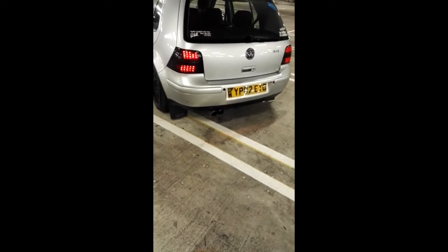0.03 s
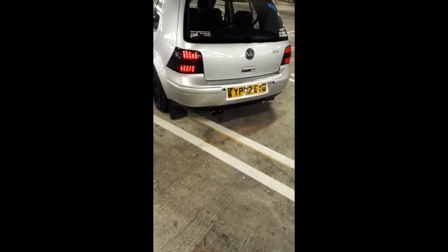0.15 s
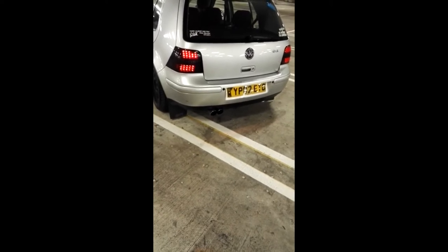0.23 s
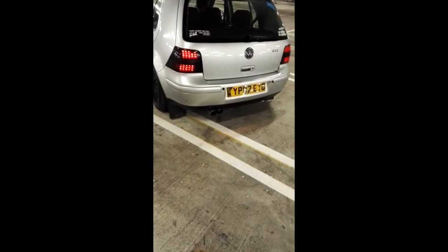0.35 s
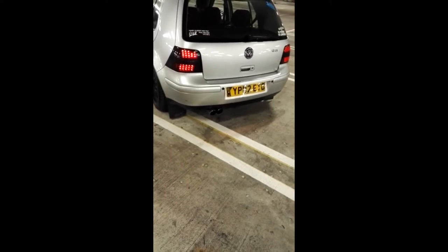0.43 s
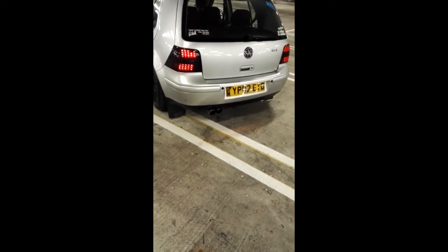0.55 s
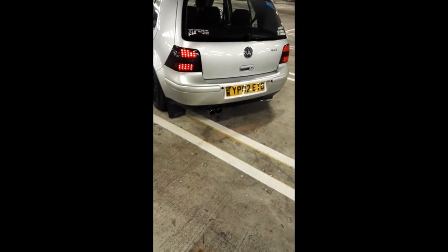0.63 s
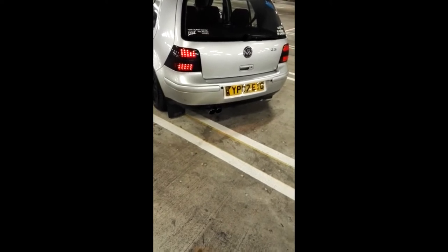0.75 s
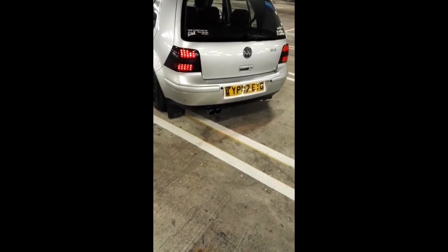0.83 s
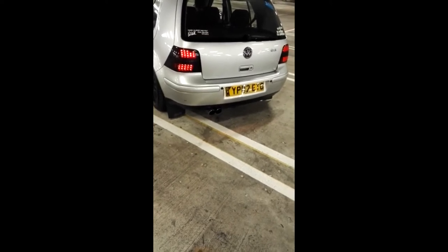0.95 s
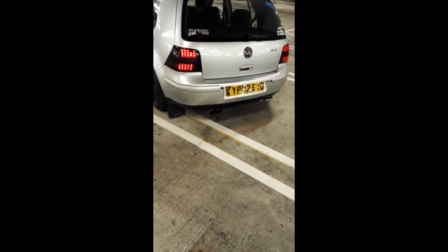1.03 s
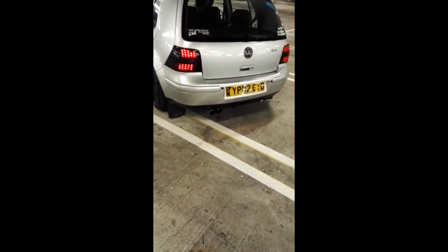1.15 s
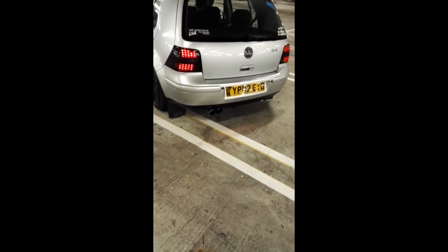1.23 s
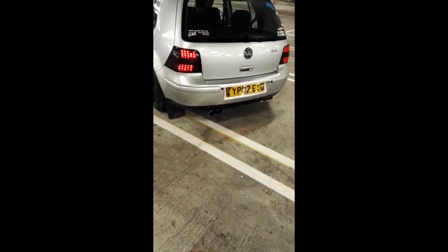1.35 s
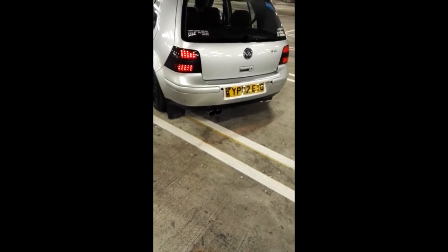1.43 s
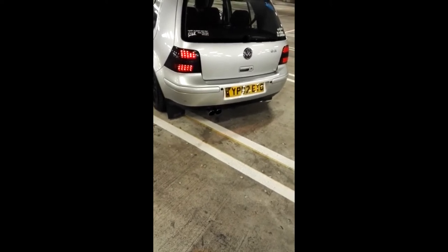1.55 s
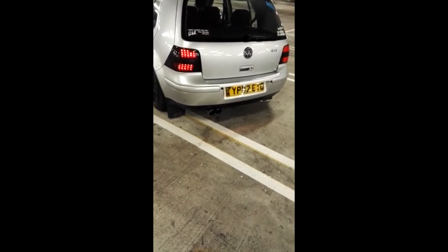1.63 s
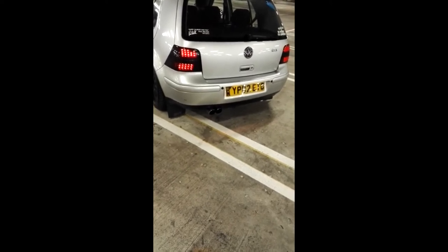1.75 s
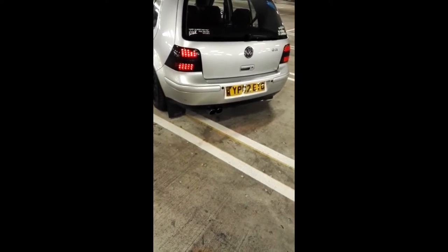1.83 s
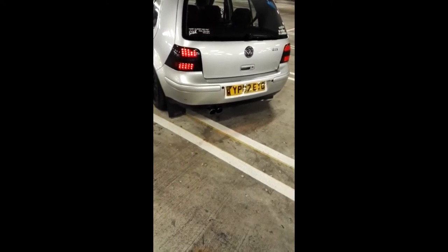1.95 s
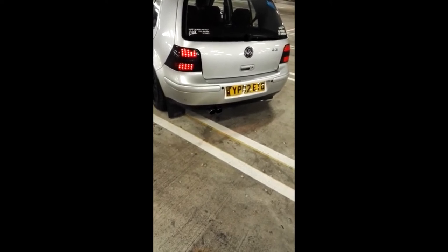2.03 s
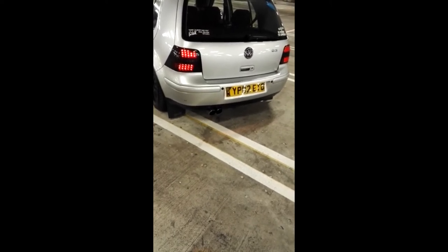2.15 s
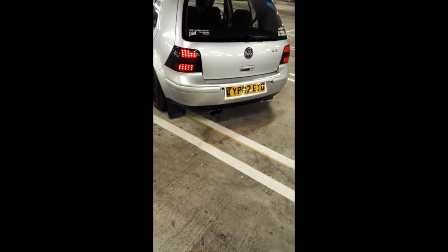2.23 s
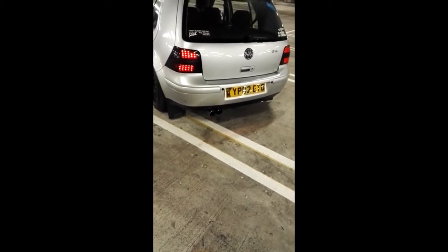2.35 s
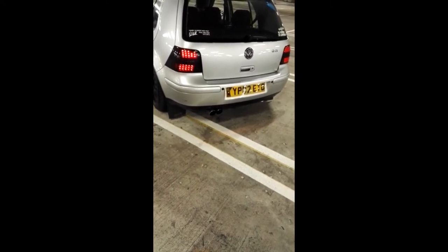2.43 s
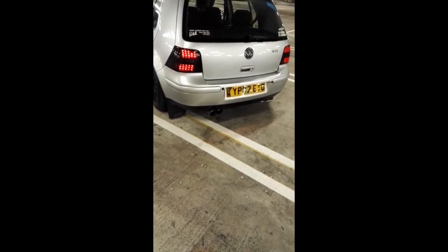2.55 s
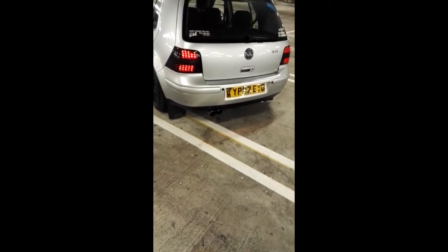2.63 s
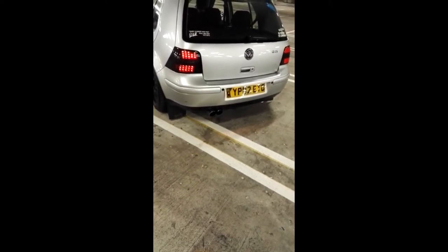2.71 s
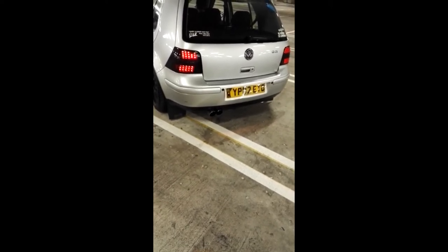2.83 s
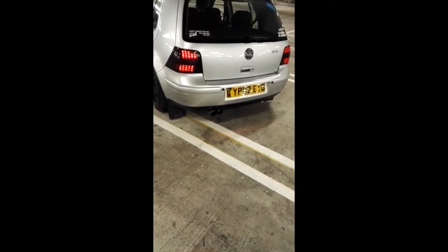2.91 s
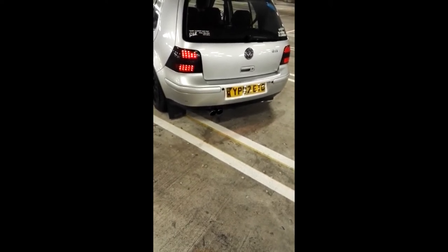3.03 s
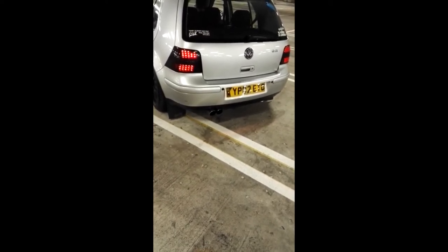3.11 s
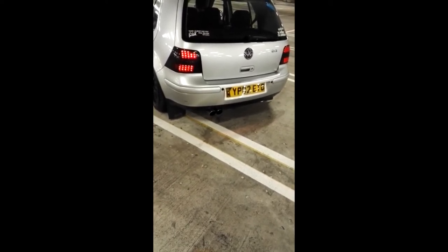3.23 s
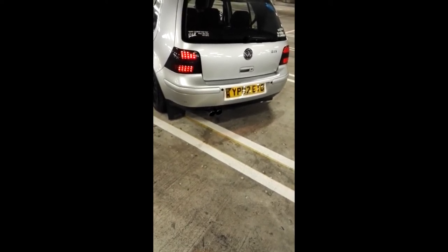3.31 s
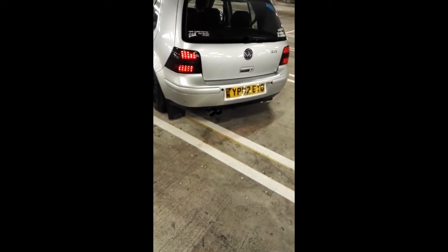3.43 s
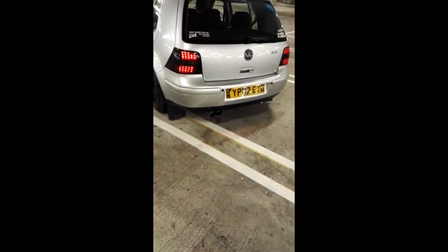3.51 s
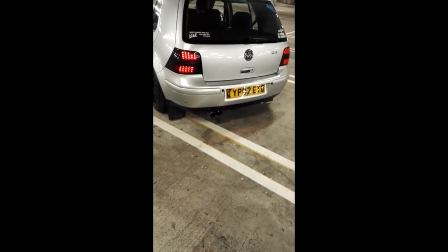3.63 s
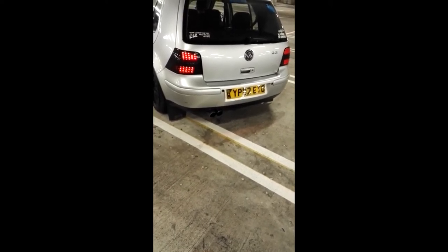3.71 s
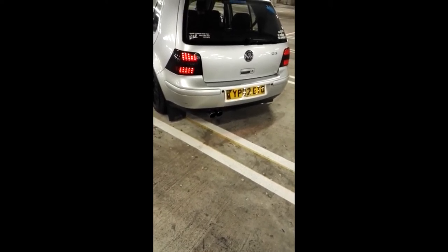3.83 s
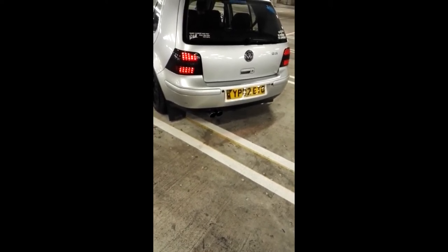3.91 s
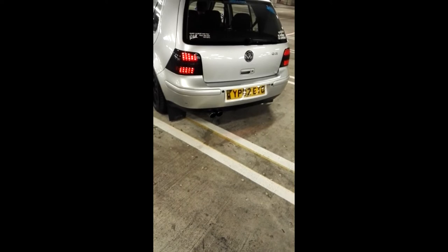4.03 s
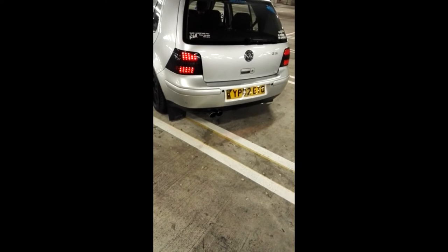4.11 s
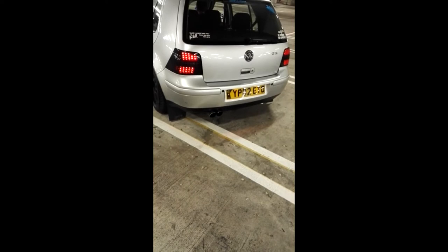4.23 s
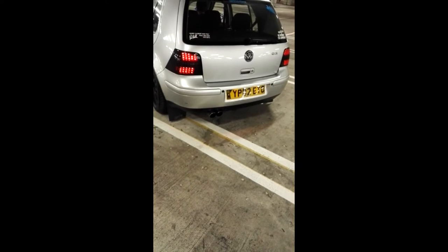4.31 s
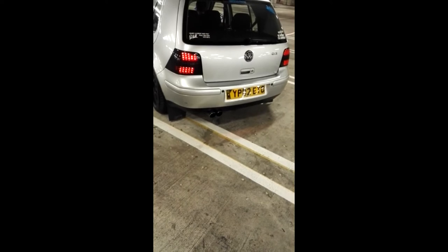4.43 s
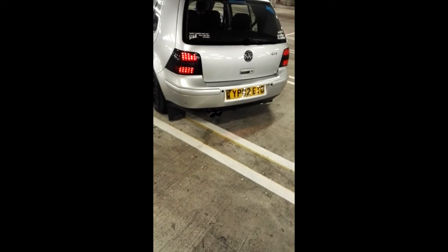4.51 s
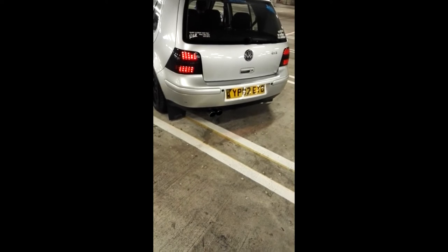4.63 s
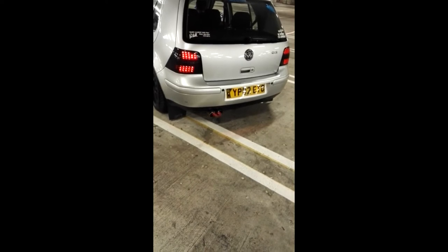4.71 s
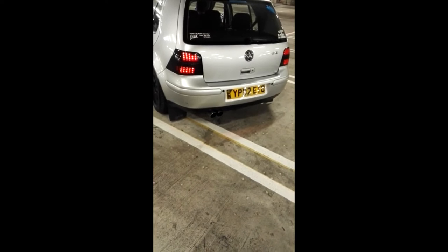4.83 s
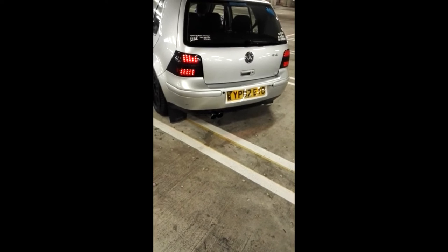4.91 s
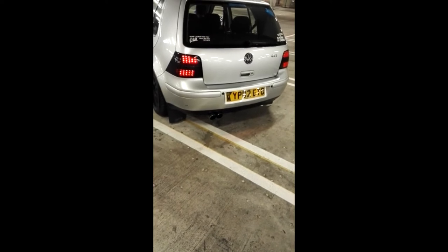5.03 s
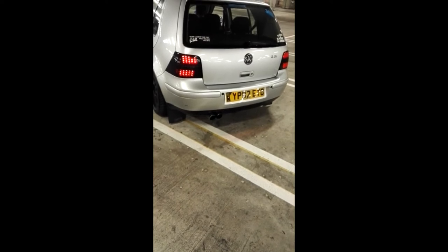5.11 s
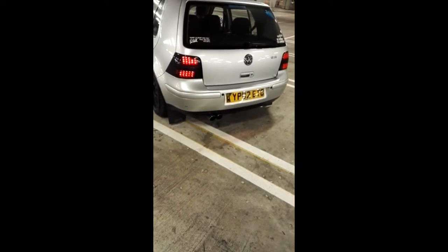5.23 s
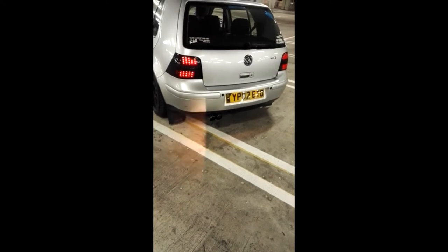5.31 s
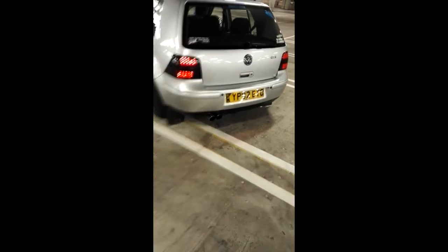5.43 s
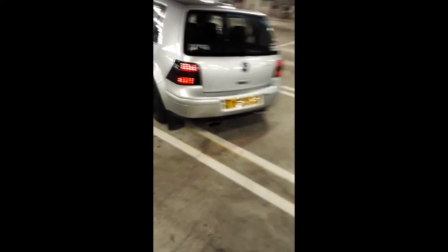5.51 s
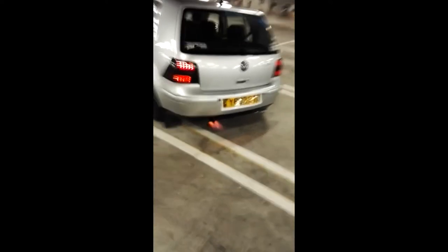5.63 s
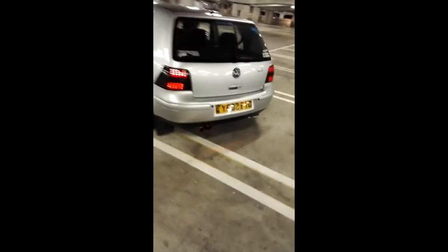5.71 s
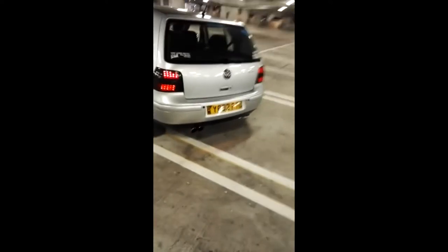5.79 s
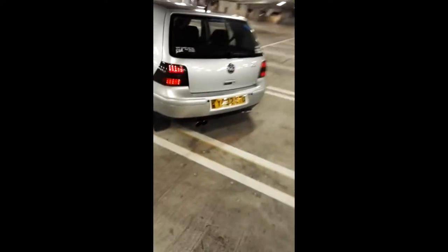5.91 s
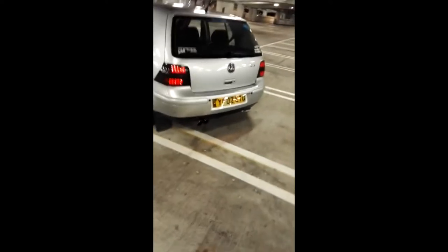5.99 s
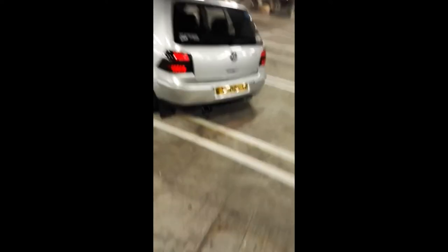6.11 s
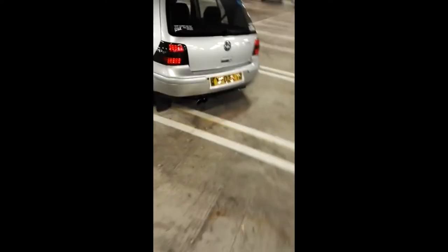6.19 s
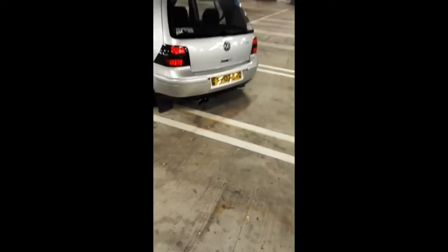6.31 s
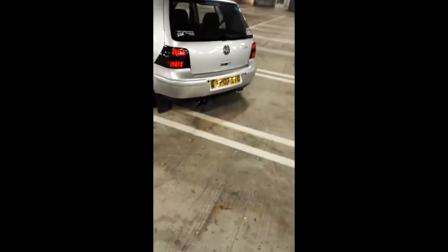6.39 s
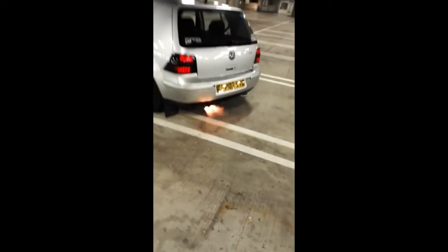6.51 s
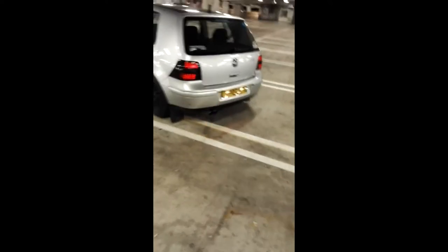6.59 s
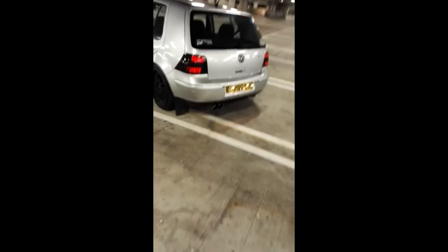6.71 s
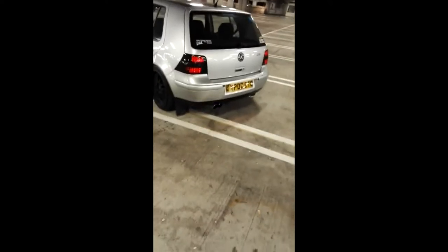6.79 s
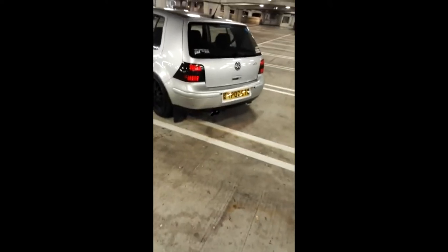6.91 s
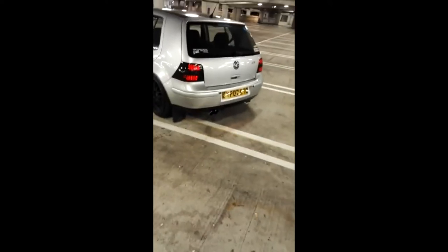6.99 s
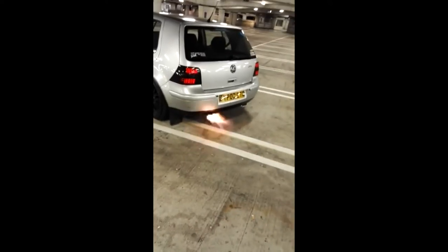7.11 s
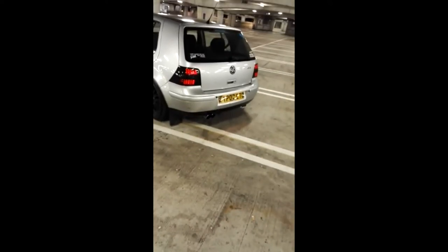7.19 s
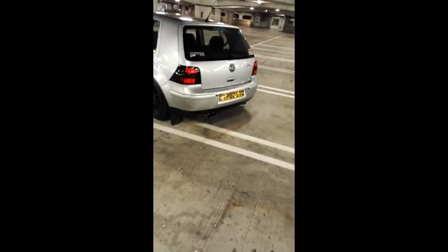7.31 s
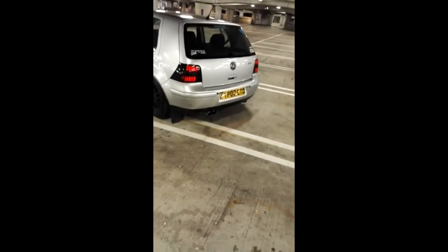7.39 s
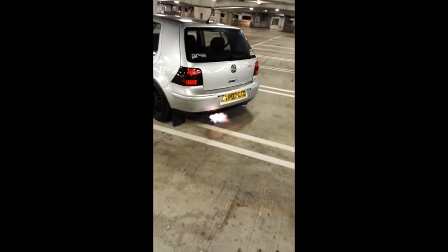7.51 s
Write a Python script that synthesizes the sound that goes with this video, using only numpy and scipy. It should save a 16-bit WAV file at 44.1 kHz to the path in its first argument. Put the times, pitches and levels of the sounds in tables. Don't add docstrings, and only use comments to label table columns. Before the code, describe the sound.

A car held on its rev limiter stutters and buzzes, then lifts off with violent exhaust bangs ringing through a concrete car park.

```python
import sys
import numpy as np
from scipy import signal
from scipy.fft import rfft, irfft, next_fast_len
from scipy.io import wavfile
from scipy.ndimage import uniform_filter1d

SR = 44100
rng = np.random.default_rng(int(sys.argv[2]) if len(sys.argv) > 2 else 0)


def voltage_ratio(decibels):
    exponent = np.asarray(decibels, float) / 20
    return 10 ** exponent


def transcribe(signal):
    frames = np.atleast_2d(signal).T
    limited = np.clip(frames, -1, 1)
    pcm = np.round(limited * 32767).astype(np.int16)
    wavfile.write(sys.argv[1], SR, pcm)


N = 332980
HOP = 64
TIME = np.arange(N) / SR

# time in s, firing rate in Hz.
REVS = [(0, 113.9), (.2, 118.3), (.4, 124.2), (.6, 128.7), (.8, 131.7), (1, 133.3), (2.2, 131.4),
        (2.5, 132.3), (4.7, 132.6), (7.6, 129.5)]
# time in s, firing tone between surges in dB, gas flow in dB.
THROTTLE = [(0, -15.5, -1.5), (.1, -15, -3.5), (.5, -15, -3), (.75, -12, -4.5), (1.0, -16.5, -2.5),
            (1.35, -14, -5), (2.0, -15, -7.5), (2.22, -20, -1), (2.35, -14, -2.5), (2.92, -14, -2),
            (3.1, -18, -5), (3.5, -20.5, -3), (4.28, -17.5, -3.5), (4.42, -16.5, -9), (4.62, -22, -3),
            (4.76, -21, 3)]
# start in s, length in s, level in dB.
SURGES = [(0.812, 0.042, -7.3), (0.903, 0.034, -8.3), (0.994, 0.037, -6.9), (1.1, 0.046, -7.3),
          (1.256, 0.029, -7.5), (1.337, 0.047, -7.2), (1.523, 0.039, -8.4), (1.697, 0.048, -8.9),
          (1.898, 0.047, -9.3), (2.081, 0.064, -9.7), (2.19, 0.041, -10.5)]
# start in s, length in s, level in dB.
HAMMER = [(2.275, 0.046, -6.9), (2.373, 0.049, -6.2), (2.488, 0.064, -8.9), (2.611, 0.037, -8.2),
          (2.694, 0.058, -7.0), (2.815, 0.06, -8.4), (2.935, 0.064, -8.1), (3.05, 0.048, -10.4),
          (3.133, 0.061, -9.4), (3.256, 0.059, -10.9), (3.352, 0.044, -10.1), (3.458, 0.063, -10.9),
          (3.576, 0.063, -11.3), (3.67, 0.047, -10.1), (3.781, 0.067, -11.5), (3.898, 0.069, -11.1),
          (3.995, 0.029, -10.9), (4.054, 0.046, -10.1), (4.136, 0.043, -9.0), (4.218, 0.044, -10.9),
          (4.293, 0.042, -10.7), (4.414, 0.051, -11.5), (4.509, 0.051, -12.7), (4.619, 0.06, -12.1)]
# frequency in Hz, left-right likeness (-1 to 1).
SAME_NEAR = [(60, 0.8), (130, 1), (290, 0.62), (640, 0.37), (1400, 0.28), (3080, 0.036), (6760, 0.23),
             (14900, 0.31)]
# start in s, blast in dB, late ring in dB re blast, bass tilt in dB, burn in s.
BANGS = [(4.678, -34, -13, -1, .045), (4.7836, 1, -12.5, -3, 0.035), (5.416, 4, -13.5, -2.5, 0.016),
         (5.520, -2, -23, -15, .02), (5.569, -3, -4.5, -1, 0.019), (5.618, -0.5, -19, -0.5, 0.02),
         (5.691, 0.5, -18, -2.5, 0.028), (5.757, 1.5, -14, -5.5, 0.027), (5.799, -8, -28, 9.5, .035),
         (5.835, -24, -7, 23.5, .01), (6.485, 2.5, -5.5, -3.5, 0.041), (6.535, -4.5, -16.5, 6, 0.018),
         (6.604, 1, -17, -6.5, 0.066), (6.651, -5.5, -7.5, 0.5, 0.027), (6.728, -16.5, -15, 0, 0.017),
         (7.211, 4.5, -10, -1.5, 0.029), (7.269, -8, -25, 10, 0.015)]
# frequency in Hz, gain in dB.
FIRST = [(120, 3), (200, 0), (290, 8), (500, -2.5), (800, 3.5), (1200, -5), (1550, 1), (2000, -1),
         (4000, -0.5)]


def evened(x):
    return x / np.sqrt(np.mean(x ** 2) + 1e-20)


def smoothed(x, *sizes, axis=-1):
    for size in sizes:
        x = uniform_filter1d(x, size=size, axis=axis)
    return x


def read(points, hz):
    f, value = np.transpose(points)
    return np.interp(np.log(hz + 1), np.log(f + 1), value)


def columns(rows, t):
    s, *values = np.transpose(rows)
    return [np.interp(t, s, v) for v in values]


def drift(hz):
    steps = rng.standard_normal(int(N / SR * hz * 4) + 8)
    smooth = evened(smoothed(steps, 3, 3))
    return np.interp(TIME * hz * 4, np.arange(len(smooth)), smooth)


def coloured(spectrum, same):
    # frequency in Hz, left over right in dB.
    lean_db = [(60, -3), (130, 0.5), (290, 1), (640, 3), (1400, 0), (3080, -1.6), (6760, 0.5), (9000, -2.5),
               (13000, 3)]
    size = next_fast_len(N)
    hz = np.fft.rfftfreq(size, 1 / SR)
    left, other = rfft(rng.standard_normal((2, size)))
    c = np.clip(read(same, hz), -1, 1)
    lean = voltage_ratio(read(lean_db, hz) / 2)
    pair = np.array([left * lean, (c * left + np.sqrt(1 - c ** 2) * other) / lean])
    return evened(irfft(pair * voltage_ratio(read(spectrum, hz)), size)[:, :N])


def resonate(x, hz, width):
    turn = np.exp(2j * np.pi * np.cumsum(hz) / SR)
    r = np.exp(-np.pi * width / SR)
    return (turn * signal.lfilter([(1 - r) ** 2], [1, -2 * r, r * r], x / turn)).real


def resonance_db(rows, hz):
    return sum(db / (1 + (2 * (hz - f) / width) ** 2) for f, width, db in rows)


def firing_level():
    # frequency in Hz, width in Hz, gain in dB.
    nulls = [(113.3, 1.5, -5), (117.4, 1, -3.5), (123.3, 1.6, -7.5), (126.8, .9, -6), (128.9, .6, -2.5)]
    open_s, cut_s = .012, .009
    sag_db_per_s = -8
    lull_db = columns(THROTTLE, TIME)[0] + resonance_db(nulls, columns(REVS, TIME)[0])
    gate, top, last_cut_s = np.zeros(N), np.zeros(N), TIME.copy()
    for s, length, db in SURGES + HAMMER:
        near = slice(int((s - .06) * SR), int((s + length + .06) * SR))
        t = TIME[near]
        on = (np.tanh((t - s) / open_s) - np.tanh((t - s - length - .004) / cut_s)) / 2
        gate[near] += on
        top[near] += on * voltage_ratio(db + .5)
        last_cut_s[int((s + length) * SR):] = s + length + 0.059
    gate = np.minimum(gate, 1)
    sag_db = smoothed(sag_db_per_s * (TIME - last_cut_s), 900)
    return top + (1 - gate) * voltage_ratio(lull_db + sag_db), gate


def lull(gate):
    slow_db, fast_db = -9, -2
    trailing = np.minimum(2.0 * np.roll(smoothed(gate, 1800), 500), 1)
    depth_db = np.interp(TIME, [.8, 1.1, 2.05, 2.2], [0, slow_db, slow_db, fast_db])
    return voltage_ratio(depth_db * (0.72 - trailing))


def held_orders(turns, gate):
    # multiple of the firing rate, level in dB re firing tone.
    held = [(.75, -27), (1.5, -16.5), (2, -28), (2.11, -25), (2.5, -29), (3.25, -35), (5, -36), (6.35, -38),
            (9.5, -44.5), (12.87, -39.5)]
    sinking, out = lull(gate), 0
    after_cut = np.where(TIME < 2.15, sinking, 1.4 / sinking ** 5)
    for k, db in held:
        low = k < 3
        gain = after_cut if 1.9 < k < 2.2 else sinking if low else 1.3
        level = gain * voltage_ratio(db + (2 if low else 4) * drift(30))
        phase = (.5 if low else 1.2) * drift(25) + 2 * np.pi * rng.random()
        out += level * np.sin(k * turns + phase)
    return out


def climbing_orders(turns, hz):
    # multiple of the firing rate, level in dB.
    climb = [(1.5, -23), (1.75, -21), (2, -21), (2.25, -24), (2.5, -22), (2.75, -21), (3, -30), (4, -31),
             (4.75, -36), (5, -32), (6, -35), (6.25, -35), (6.5, -38), (9.5, -37)]
    # frequency in Hz, width in Hz, gain in dB.
    pipe = [(192, 16, 6), (228, 30, 6), (292, 24, 9), (628, 20, 17), (800, 50, 5), (1215, 60, 6)]
    fade_db_per_s = -14
    first, out = slice(0, SR), 0
    for k, db in climb:
        uneven = (k < 3) * (k % .5 > 0)
        level_db = db + resonance_db(pipe, k * hz[first]) + uneven * fade_db_per_s * TIME[first]
        level = voltage_ratio(level_db + 3.3 * drift(9.54)[first])
        out += level * np.sin(k * turns[first] + 2 * np.pi * rng.random())
    return np.pad(out, (0, N - SR))


def exhaust(level, gate):
    # time in s, level in dB.
    boom = [(4.775, -27), (4.82, -12), (4.87, -19.5), (5.33, -21.5), (6, -35), (6.2, -21.5), (6.5, -21.5),
            (6.8, -16), (7.12, -28.5), (7.45, -22)]
    hz = columns(REVS, TIME)[0]
    turns = 2 * np.pi * np.cumsum(hz * (1 + 0.00439 * drift(16.6))) / SR
    climbing = np.clip((.86 - TIME) / 0.078, 0, 1)
    lifted = np.clip((TIME - 4.72) / 0.026, 0, 1)
    upper = np.sqrt(level * smoothed(level, 12000))
    upper *= voltage_ratio(.45 * columns(THROTTLE, TIME)[1])
    running = level * np.sin(turns - .35 * smoothed(gate, 500))
    running += (1 - climbing) * upper * held_orders(turns, gate)
    running += voltage_ratio(-17.5) * climbing * climbing_orders(turns, hz)
    pipe_air = np.sin(turns + 1.2 * drift(6)) + .5 * evened(resonate(rng.standard_normal(N), hz, 50))
    mono = (1 - lifted) * np.sqrt(2) * running + lifted * voltage_ratio(columns(boom, TIME)[0]) * pipe_air
    return np.array([np.roll(mono, -4), mono]) * voltage_ratio([[.55], [-.55]])


def knocks():
    knock_db, knock_s, huff_db, huff_s = -0.5, 0.0013, -34, 0.023
    out, t = np.zeros(N), np.arange(1500) / SR
    u = t / knock_s
    for s, length, db in SURGES + HAMMER:
        level = voltage_ratio(db + knock_db - 1.2 * s + 2 * rng.standard_normal())
        out[int((s + length) * SR):][:len(u)] += level * u * (2 - u) * np.exp(-u)
        huff = signal.lfilter([1], [1, -.8], rng.standard_normal(len(t))) * np.exp(-t / huff_s)
        out[int((s + length - .006) * SR):][:len(t)] += voltage_ratio(db + huff_db - 0.58 * s) * huff
    return out


def rumble(flow_db, throb, gate):
    # frequency in Hz, density in dB per Hz.
    spectrum = [(150, -16.5), (185, -18.5), (230, -21.5), (285, -26), (375, -31), (450, -28.5), (670, -33),
                (900, -34.5), (1100, -42), (1500, -75), (3300, -100)]
    sound = voltage_ratio(-24.5 + flow_db + 0.77 * throb + 2.0 * drift(30)) * coloured(spectrum, SAME_NEAR)
    high_pass = signal.butter(2, 110, "high", fs=SR, output="sos")
    return signal.sosfilt(high_pass, sound) * lull(gate) ** .6


def thud(gate):
    # frequency in Hz, density in dB per Hz.
    spectrum = [(20, -22), (35, -29), (55, -13), (80, 4), (100, 4.5), (115, -1), (200, -70)]
    kick_db = 7 + 8 * (TIME < 2.15) + 5 * np.exp(-abs(TIME - .9) / 0.21)
    era_db = -3.9 * (TIME < .79) + 3.9 * (TIME > 2.15) - 3.6 * (TIME > 4.45)
    return voltage_ratio(-36.0 + kick_db * gate ** 2 + era_db) * coloured(spectrum, [(25, 0.75), (70, 0.96)])


def bay_hiss(flow_db, throb):
    # frequency in Hz, density in dB per Hz.
    spectrum = [(410, -8), (700, -10.5), (859, -13), (1140, -14), (1230, -10.5), (1590, -11.5),
                (1760, -11.5), (2250, -13.5), (3710, -16.5), (4730, -22), (11000, -20), (14300, -22),
                (15000, -49)]
    bay_db = -41 + 0.28 * np.minimum(flow_db, 1) - 1.41 * abs(TIME - 1.1) - 2 * (TIME < .6)
    return voltage_ratio(bay_db + 9.0 + 1.5 * throb + 1.0 * drift(60)) * coloured(spectrum, SAME_NEAR)


def whistle(late):
    # time in s, pitch in Hz, level in dB.
    turbo = [(0, 6360, -75), (.15, 6630, -55.5), (.75, 7300, -57), (1.4, 8200, -52.5), (1.75, 8034, -59),
             (2.05, 7190, -58), (2.2, 8440, -54), (2.33, 9500, -41.5), (2.45, 10200, -50),
             (2.7, 10750, -51.5), (4.3, 10430, -57.5)]
    hz, level_db = columns(turbo, TIME)
    width = .36 * (hz - 5800)
    wobble = hz + 0.48 * width * drift(900)
    tone = np.sin(2 * np.pi * np.cumsum(wobble) / SR) * (1 + .5 * drift(400))
    tone *= voltage_ratio(level_db + 6.0 + 2.9 * late * (TIME > .8))
    return tone * voltage_ratio([[-.5], [.5]])


def engine_noise(gate):
    flow_db = columns(THROTTLE, TIME)[1]
    late = np.roll(gate, 400) - .4
    throb = np.where(TIME < 1.8, .38, .16) * (TIME > .75) * late
    on = voltage_ratio(-18 * np.clip((TIME - 4.78) / 0.065, 0, 1))
    return on * (rumble(flow_db, throb, gate) + thud(gate) + bay_hiss(flow_db, throb) + whistle(late))


def puffs():
    # start in s, peak in dB, centre in Hz.
    air_puffs = [(0.835, -31, 8280), (0.925, -39, 8300), (1.018, -30, 9290), (1.118, -28, 9710),
                 (1.15, -31, 8000), (1.275, -27.5, 10410), (1.355, -30.5, 9350), (1.5386, -34, 9510),
                 (1.721, -28, 8870), (1.9238, -32, 9130), (2.2084, -31, 8340), (2.3079, -31, 9360),
                 (2.3983, -29, 9790), (2.5456, -31, 10620), (2.615, -32, 11200), (2.6959, -31, 11000),
                 (2.746, -31, 11080), (2.8249, -33, 11170), (2.8689, -30, 10500), (2.9520, -32.5, 10470),
                 (2.9891, -33.5, 9770), (3.2709, -42, 10690), (3.7131, -43, 9690), (3.8339, -34, 9730),
                 (4.0207, -36, 10600), (4.25, -40, 9620), (4.5584, -34, 9180), (4.6799, -33, 9810)]
    out, t = np.zeros(N), np.arange(2600) / SR
    for s, db, hz in air_puffs:
        air = rng.standard_normal(len(t))
        band = evened(resonate(air, hz * (1 - 1.2 * t), 3000)) + 0.32 * air
        part = out[int(s * SR):][:len(t)]
        part += voltage_ratio(db - 8.5) * band * (1 - np.exp(-t / 0.0013)) * np.exp(-t / 0.027)
    return out


def pop():
    t = np.maximum(TIME - 4.6785, 0)
    dip = -voltage_ratio(7.5) * (t / 0.0015) * np.exp(-t / 0.0011) * np.cos(2 * np.pi * 60 * t)
    ring = voltage_ratio(-20.5) * np.sin(2 * np.pi * 290 * t) * np.exp(-t / 0.096)
    note = voltage_ratio(-31.5) * evened(resonate(rng.standard_normal(N), np.full(N, 850.), 260))
    return dip + ring + note * (t / 0.017) * np.exp(1 - t / 0.018)


def howl():
    rising_hz = 665 + 1800 * np.clip(TIME - 6.65, -.06, .1)
    gas = rng.standard_normal(N)
    tone = np.sin(2 * np.pi * np.cumsum(rising_hz) / SR) + .5 * evened(resonate(gas, rising_hz, 90))
    tone *= np.exp(-((TIME - 6.675) / 0.055) ** 2)
    second = evened(resonate(gas, 1.92 * rising_hz, 120)) * np.exp(-((TIME - 6.665) / 0.025) ** 2)
    return voltage_ratio(-9.5) * (tone + voltage_ratio(-4) * second)


def thump():
    t = TIME - 4.8
    hz = 310 - 175 / (1 + np.exp(-np.clip((t - .02) / 0.0011, -30, 30)))
    swing = np.sin(2 * np.pi * np.cumsum(hz) / SR) * np.exp(-((t - .022) / 0.02) ** 2)
    return voltage_ratio(-4.5) * swing - voltage_ratio(-2) * np.exp(-((TIME - 4.7922) / 0.00067) ** 2)


def patches(shape, bins, frames):
    return evened(smoothed(smoothed(rng.standard_normal(shape), bins, axis=0), frames, axis=1))


def field(spectrum, lumps_db):
    # frequency in Hz, left-right likeness (-1 to 1).
    same_far = [(60, -0.076), (130, 0.94), (290, 0.87), (640, 0.5), (1400, -0.13), (3080, 0.097),
                (6760, -0.18), (12000, -0.0077), (14900, 0)]
    z = signal.stft(coloured(spectrum, same_far), nperseg=256, noverlap=256 - HOP)[2]
    lumps = patches(z.shape[1:], bins=6, frames=20) + .5 * patches(z.shape[1:], bins=128, frames=5)
    return z * voltage_ratio(lumps_db * lumps)


def bang_colour_db(s, bass_db, hz):
    return (s < 5) * read(FIRST, hz) + bass_db / (1 + (hz / 900) ** 2)


def blasts():
    # frequency in Hz, density in dB per Hz.
    blast = [(15, -58), (25, -7), (59, -12), (139, -8.5), (709, -7), (856, -6.5), (1210, -9.5),
             (1580, -7.5), (2130, -10), (9270, -14.5), (10900, -12.5), (13500, -16.5), (15500, -21)]
    # frequency in Hz, t60 in s.
    early = [(60, 0.28), (300, 0.86), (1500, 0.64), (6000, 0.42), (14000, 0.51)]
    crack_db, crack_s = -10, 0.00038
    refill_s, shortest = 0.088, 0.51
    burn_db, burn_end_s = 0.5, .004
    hz, z, out = np.fft.rfftfreq(256, 1 / SR)[:, None], field(blast, 1.4), np.zeros((2, N + SR))
    pause = np.diff(np.transpose(BANGS)[0], prepend=0)
    u = np.arange(200) / SR / crack_s
    for (s, db, _, bass_db, burn), wait in zip(BANGS, pause):
        lasting = 1 - (1 - shortest) * np.exp(-wait / refill_s)
        start = int(s * SR) // HOP - 4
        age = np.maximum((start + np.arange(int(480 * lasting))) * HOP / SR - s, 0)
        burning_db = burn_db * (1 / (1 + np.exp(np.minimum((age - burn) / burn_end_s, 30))) - .5)
        decay_db = -60 * np.maximum(age - burn / 2, 0) / lasting / read(early, hz)
        shape = voltage_ratio(db + burning_db + bang_colour_db(s, bass_db, hz) + decay_db)
        pick = int(rng.random() * (z.shape[2] - len(age)))
        piece = z[:, :, pick:pick + len(age)] * shape
        sound = signal.istft(piece, nperseg=256, noverlap=256 - HOP)[1]
        since = np.maximum((start * HOP + np.arange(sound.shape[1])) / SR - s, 0)
        attack = (1 - np.exp(-since / 0.00036)) * (1 + 0.21 * lasting ** 2 * np.exp(-since / 0.006))
        out[:, start * HOP:][:, :sound.shape[1]] += sound * attack
        out[:, int(s * SR):][:, :len(u)] -= voltage_ratio(db + crack_db) * (1 - u) * np.exp(-u)
    return out[:, :N] * voltage_ratio(1.5 * drift(500))


def ringing():
    # frequency in Hz, density in dB per Hz.
    ring = [(40, -44), (90, -25), (115, -8.5), (260, -8), (450, -12), (600, -7.5), (900, -8.5),
            (1150, -12.5), (1550, -13.5), (2850, -19), (5000, -23), (8270, -19), (13900, -36), (15000, -40)]
    # frequency in Hz, t60 in s.
    late_t60 = [(100, 2.7), (300, 7.2), (800, 5.8), (1800, 4.1), (4500, 2.17), (8000, 1.14), (14000, 1.47)]
    frame_s = np.arange(N // HOP + 9) * HOP / SR
    hz, z = np.fft.rfftfreq(256, 1 / SR)[:, None], field(ring, 0.95)
    first = int(BANGS[0][0] * SR) // HOP
    power = np.zeros(z.shape[1:])
    for s, db, ring_db, bass_db, _ in BANGS:
        age = np.maximum(frame_s[first:z.shape[2]] - s, 0)
        fill = 1 - np.exp(-age / 0.13)
        level_db = db + ring_db + bang_colour_db(s, bass_db, hz) - 60 * age / read(late_t60, hz)
        power[:, first:] += (fill * voltage_ratio(level_db)) ** 2
    return signal.istft(z * np.sqrt(power), nperseg=256, noverlap=256 - HOP)[1][:, :N]


def ducking(dry):
    from_db, depth_db, sense, duck_s, recover_s = -7.5, -8, 3.6, 0.0085, 5.24
    power_db = 10 * np.log10(abs(smoothed((dry ** 2).mean(0), 900)) + 1e-12)
    held = np.maximum(power_db - from_db, 0) * sense
    for seconds in (duck_s, recover_s):
        held = signal.lfilter([1 / (seconds * SR)], [1, 1 / (seconds * SR) - 1], held)
    return depth_db * np.tanh(held)


def snapped(x):
    # time in s, channel (0 left, 1 right), peak re full scale.
    snaps = [
        (5.519, 0, 1.06),
        (5.6209, 1, -1.15),
        (5.7062, 1, -1.08),
        (5.7621, 0, 1.2),
        (6.523, 0, 1.2),
        (6.6123, 0, -1.15),
        (7.2274, 0, -1.1),
    ]
    out, t = x.copy(), np.arange(-20, 21) / SR
    for s, channel, peak in snaps:
        part = out[channel, int(s * SR) - 20:][:len(t)]
        part += (peak - part) * np.exp(-(t / .00007) ** 2)
    return out


def folded(z, hz, spared, faint):
    # frequency in Hz, share (0 to 1).
    fold_share = [(5900, 0), (6300, .55), (7600, .76), (11700, .72), (12400, .3), (14000, .26)]
    flipped, makeup = .06, voltage_ratio(2.2)
    chance = rng.standard_normal((2, len(hz) // 8 + 1, z.shape[2] // 2 + 1))

    def blocks(draw, bins):
        spread = evened(smoothed(smoothed(draw, 3, axis=1), bins, axis=0))
        odds = 1 / (1 + np.exp(-1.7 * spread))
        return np.repeat(np.repeat(odds, 8, axis=0), 2, axis=1)[:len(hz), :z.shape[2]]

    wide, thin = blocks(chance[0], 3), blocks(chance[1], 2)
    after_lift = np.arange(z.shape[2]) > 4.75 * SR / 512
    flip = (thin < flipped * (1 - spared)) & (hz[:, None] > 6200) & after_lift
    share = read(fold_share, hz)[:, None]
    share = np.where(faint & (share > .2), .78, share)
    mono = (wide < share * (1 - spared)) & ~flip
    mid, side = (z[0] + z[1]) / 2, (z[0] - z[1]) / 2
    mid = np.where(mono, mid * makeup, mid * ~flip)
    side = np.where(flip, side * makeup, side * ~mono)
    return np.array([mid + side, mid - side])


def starved(x):
    edge_hz = 14550
    hz, t, z = signal.stft(x, SR, nperseg=1024)
    f = hz[:, None]
    level_db = 10 * np.log10(smoothed((abs(z) ** 2).mean(0), 12, axis=0) + 1e-14)
    under_db = level_db[8:60].mean(0) - level_db
    rise_db = np.diff(level_db[100:300].mean(0), prepend=0)
    need = np.clip(2.7 - .085 * (under_db - 3) - f / 14000, .55, 3) + np.clip((9000 - f) / 3000, 0, 3)
    need += 9 * ((rise_db > 9) | (np.roll(rise_db, 1) > 9))
    need -= .35 * (t > 4.8)
    bands = evened(smoothed(rng.standard_normal((len(hz) // 6 + 1, len(t))), 3, axis=1))
    kept = np.where(np.repeat(bands, 6, axis=0)[:len(hz)] > need, .01, 1)
    top = np.clip((edge_hz - 250 + 900 * (rise_db > 12) - f) / 300, voltage_ratio(-75), 1)
    onset = np.minimum(signal.lfilter([1], [1, -.6], 1. * (rise_db > 9)), 1)
    narrowed = folded(z, hz, onset, (under_db > 24) & (t > 4.8))
    return signal.istft(narrowed * kept * top, SR, nperseg=1024)[1][:, :N]


def hushed(x):
    hushes = [
        4.7825,
        5.4148,
        6.484,
        7.2098,
    ]
    out, size = x.copy(), int(.011 * SR)
    for s in hushes:
        part = out[:, int(s * SR) - size:int(s * SR)]
        dull = smoothed(part, 5, 6, 7 if s < 5 else 3)
        part += .93 * (dull - part) * signal.windows.tukey(size, .4)
    return out


def scene():
    level, gate = firing_level()
    engine = exhaust(level, gate) + engine_noise(gate) + knocks() + puffs()
    return engine + pop() + howl() + thump() + blasts() + ringing()


def top_cut(x):
    return signal.sosfilt(signal.butter(12, 15460, fs=SR, output="sos"), x)


def record(dry):
    ceiling, knee, gain_db, lag_s = 1.5, 3.0, -0.66, 0.032
    saturated = dry / (1 + abs(dry / ceiling) ** knee) ** (1 / knee)
    duck_db = np.roll(ducking(dry), int(lag_s * SR)) * (TIME > lag_s)
    ducked = saturated * voltage_ratio(gain_db + duck_db)
    mix = np.clip(hushed(starved(snapped(ducked))), -1, 1)
    return top_cut(mix)


dry = scene()
out = record(dry)
transcribe(out)
```